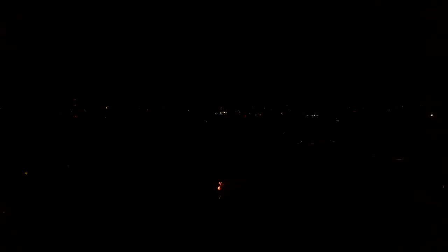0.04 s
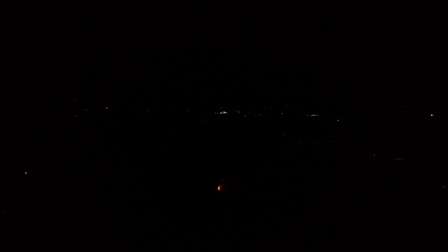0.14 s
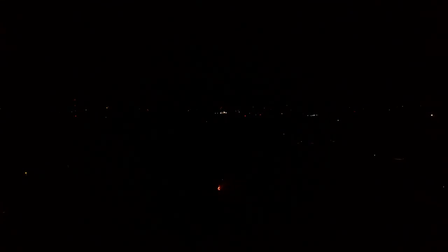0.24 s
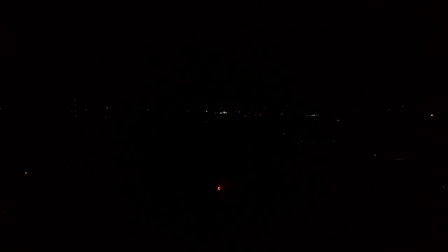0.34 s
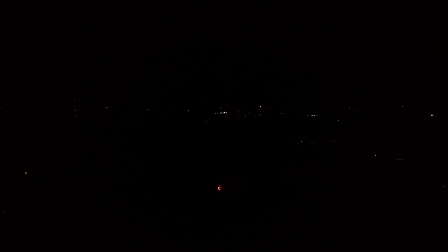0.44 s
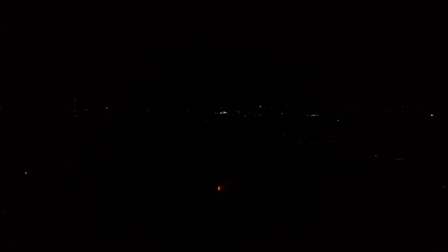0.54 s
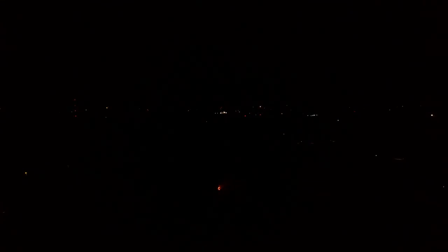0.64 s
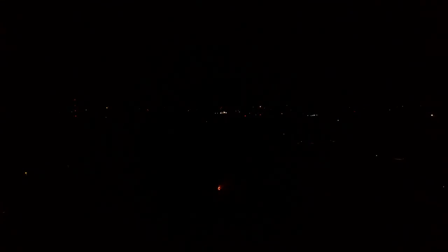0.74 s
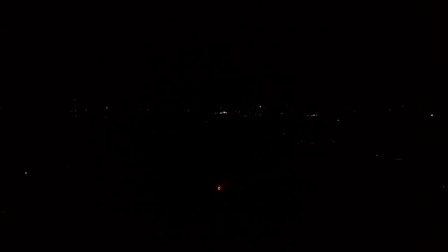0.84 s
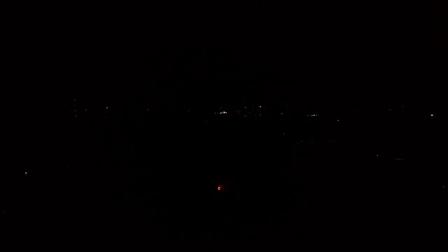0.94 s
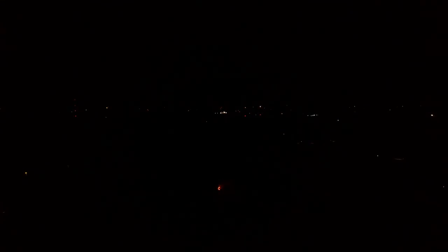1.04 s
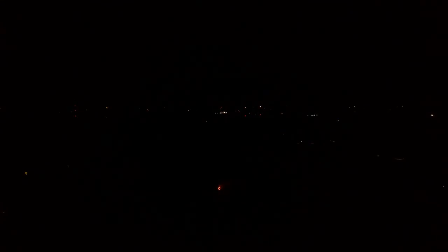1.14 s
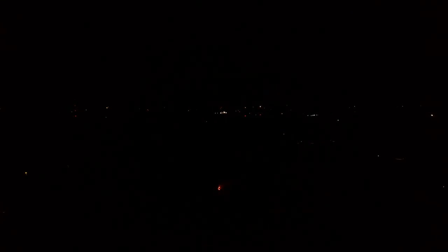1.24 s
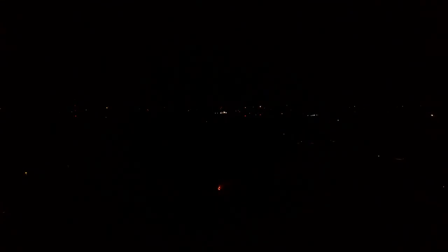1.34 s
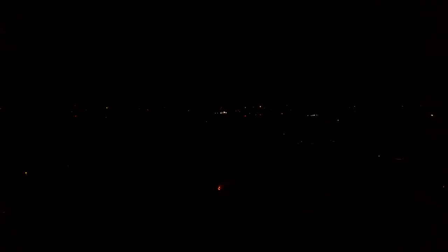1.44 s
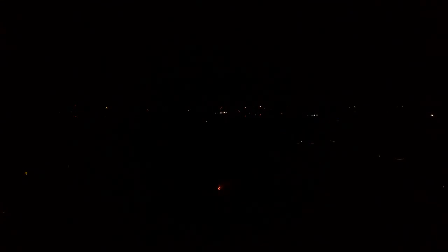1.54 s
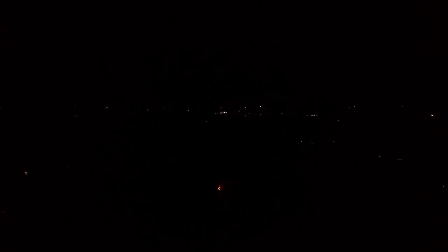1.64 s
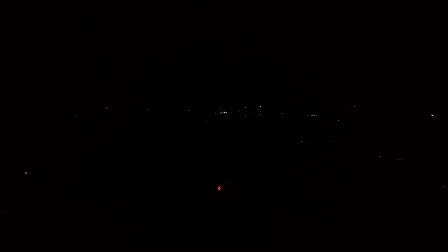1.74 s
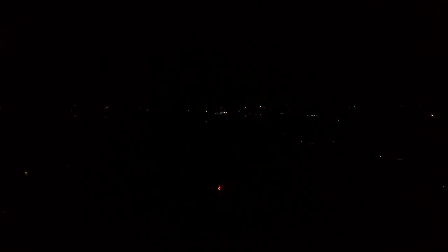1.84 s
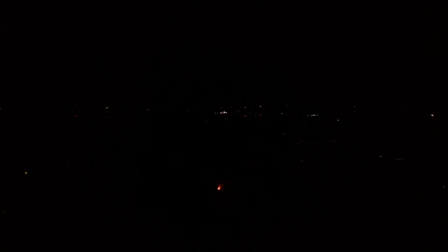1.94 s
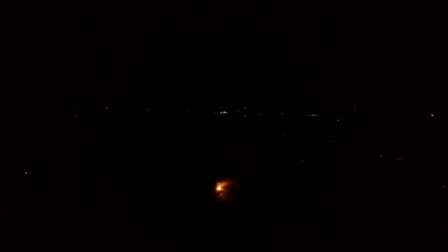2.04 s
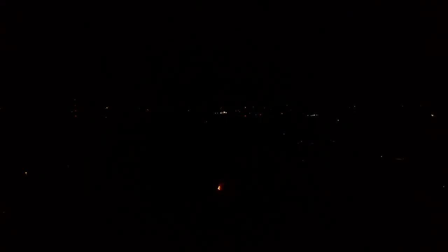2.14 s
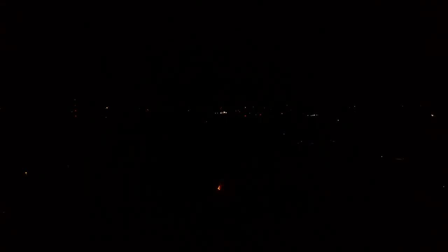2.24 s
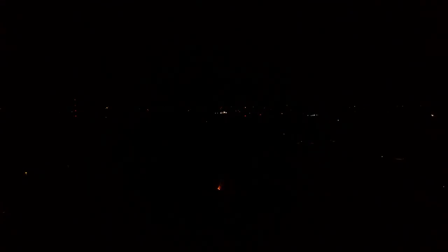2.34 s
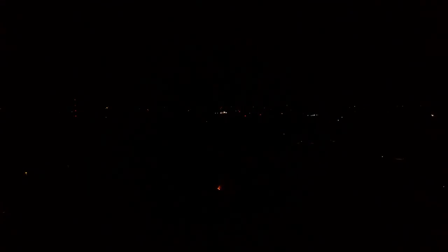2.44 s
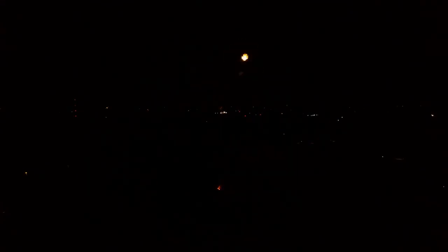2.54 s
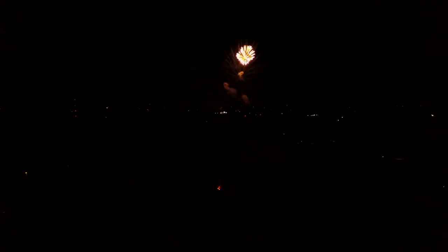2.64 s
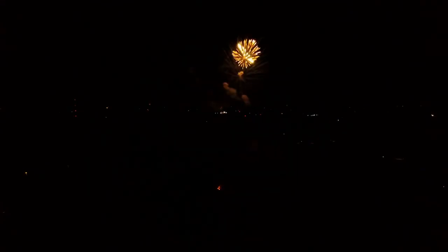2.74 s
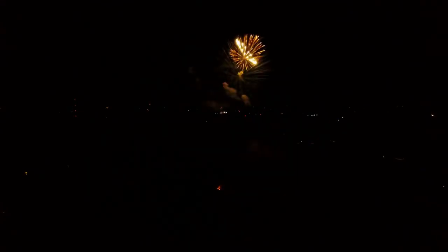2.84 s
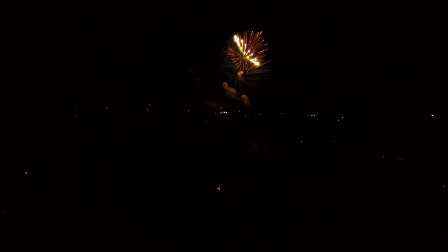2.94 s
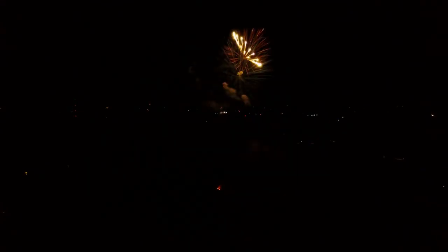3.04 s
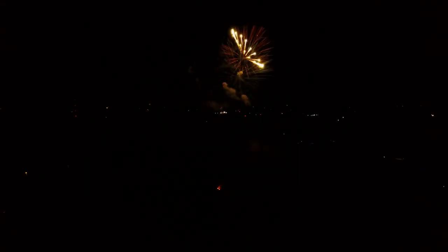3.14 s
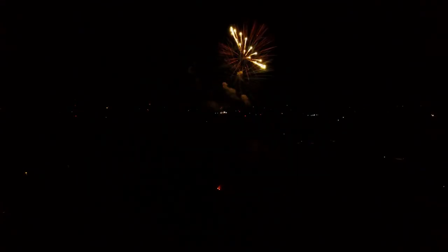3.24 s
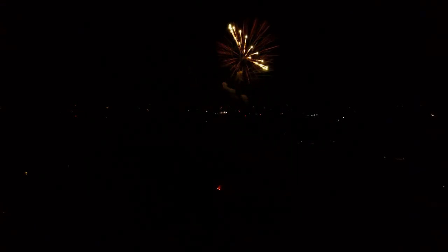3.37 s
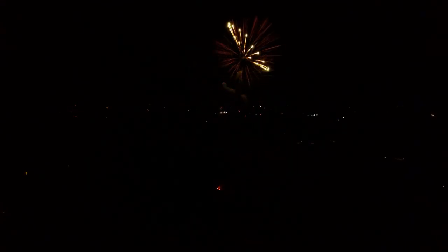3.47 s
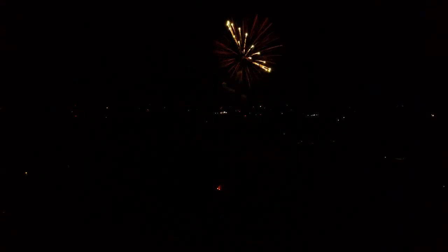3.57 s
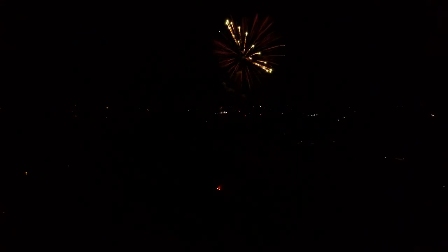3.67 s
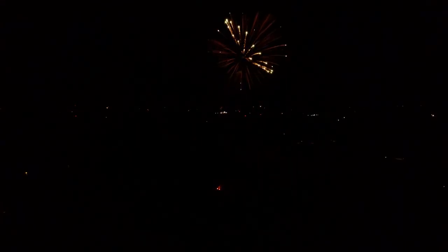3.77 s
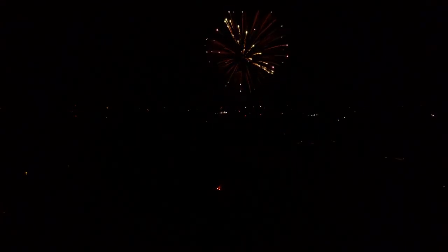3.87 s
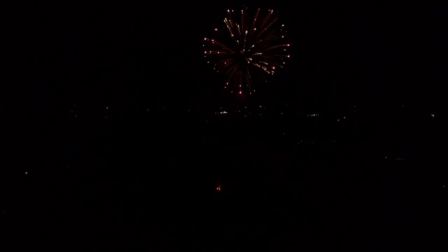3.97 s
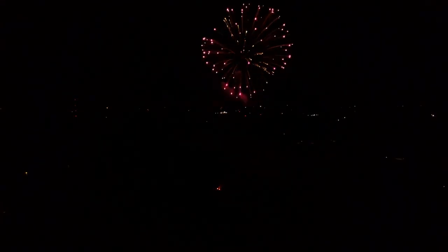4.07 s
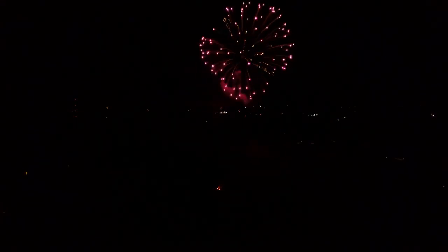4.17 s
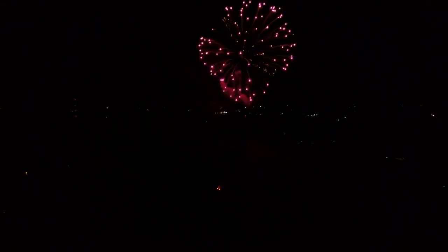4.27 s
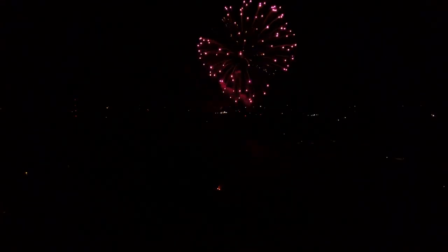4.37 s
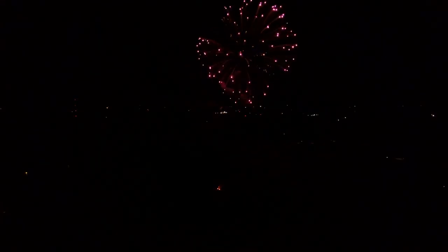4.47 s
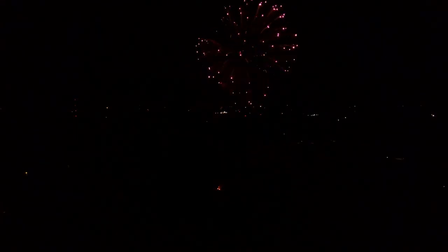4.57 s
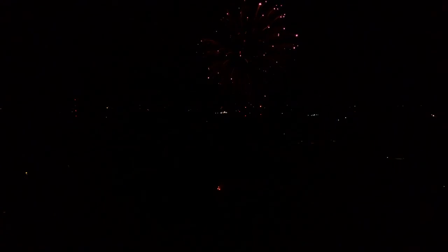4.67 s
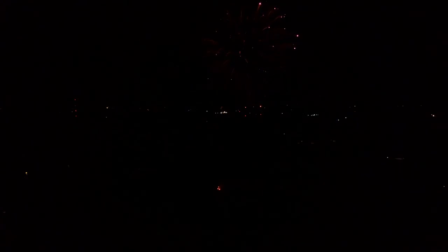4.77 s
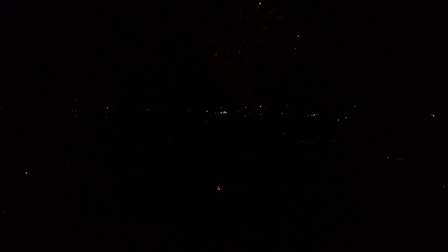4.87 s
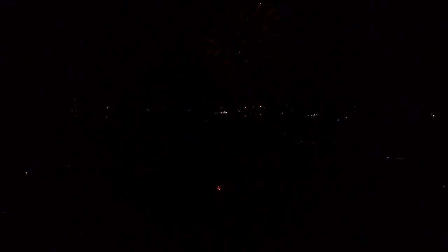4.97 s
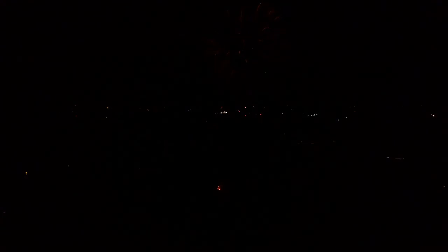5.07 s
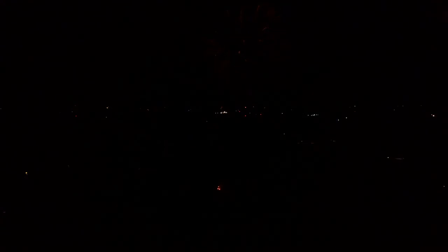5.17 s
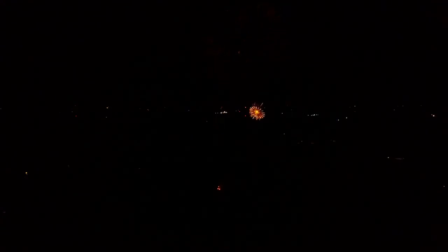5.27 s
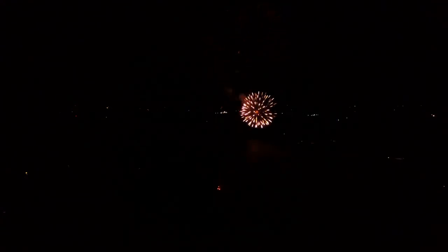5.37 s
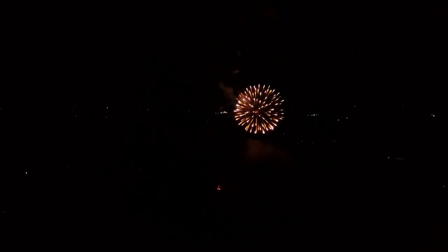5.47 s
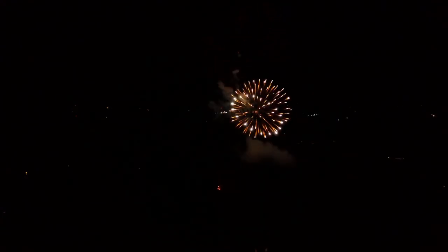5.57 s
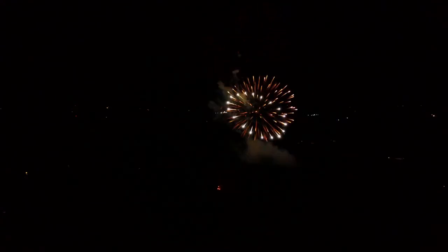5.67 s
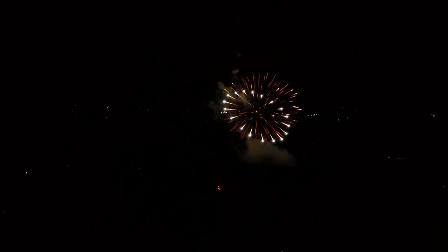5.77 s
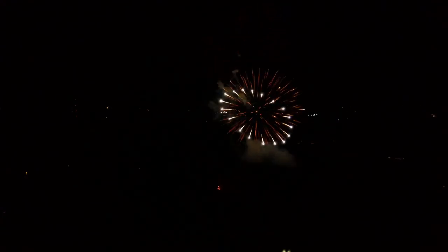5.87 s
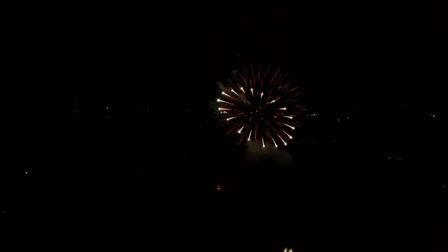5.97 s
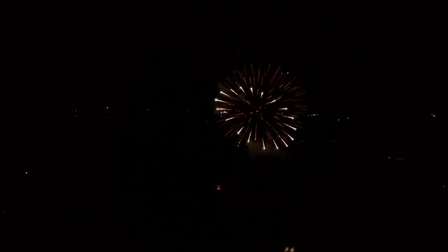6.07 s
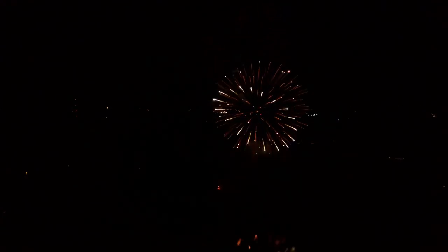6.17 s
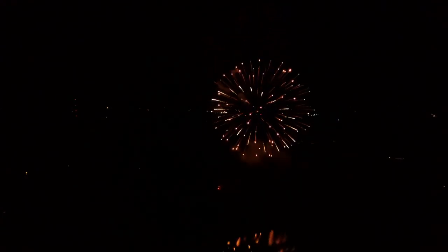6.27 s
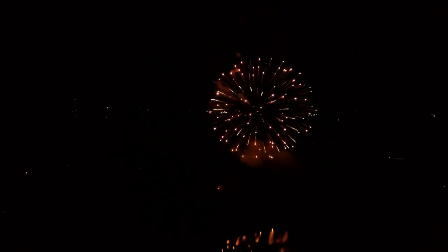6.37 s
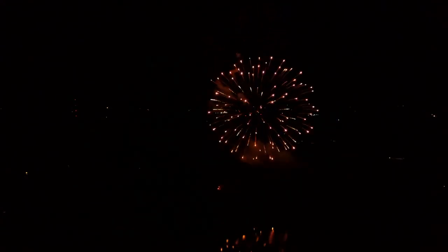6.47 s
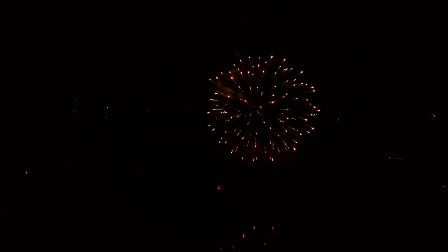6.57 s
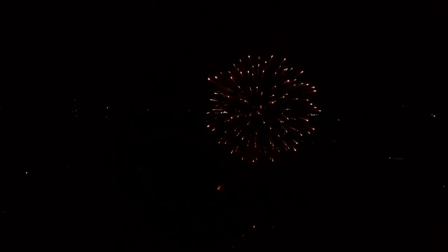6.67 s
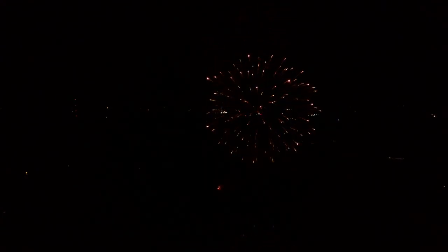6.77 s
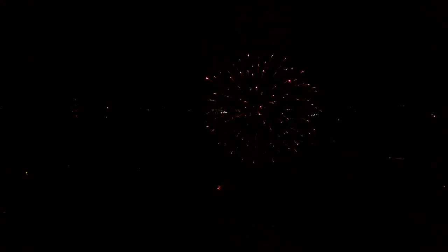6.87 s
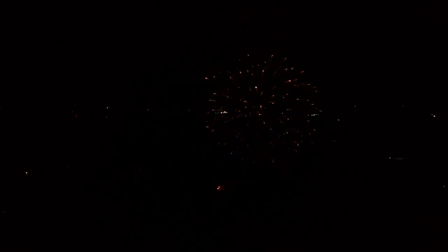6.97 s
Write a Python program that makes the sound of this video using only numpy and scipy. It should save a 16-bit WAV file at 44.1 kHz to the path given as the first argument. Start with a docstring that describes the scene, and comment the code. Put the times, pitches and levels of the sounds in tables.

```python
"""Mortars fire and their shells burst over a town at night, heard from a camera on a hillside.
Each bang is a shock front with crackle, a boom of shaped noise and a clatter of random reflections.
Walls slap the shots back; long echoes roll in as swelling, dulled grains. Faint far fireworks pop too.
A distant engine hums over street rumble (wavering sines, noise); the camera adds motor whine and hiss.
Its gain control ducks under loud sound, and the biggest bangs clip flat."""
import sys
import numpy as np
from scipy import signal
from scipy.fft import rfft, irfft, next_fast_len
from scipy.io import wavfile
from scipy.ndimage import minimum_filter1d

SR = 44100
rng = np.random.default_rng(int(sys.argv[2]) if len(sys.argv) > 2 else 0)


def int16_out(signal):
    """Quantize to a 16-bit WAV file."""
    q = np.round(np.clip(np.atleast_2d(signal).T, -1, 1) * 32767)
    wavfile.write(sys.argv[1], SR, q.astype(np.int16))


N = 309141
TIME = np.arange(N) / SR

# mortars firing on the ground: (time [s], front level [dB], push [ms], edge [Hz],
# clatter level [dB], clatter t60 [s], echo level [dB], roll level [dB])
LAUNCHES = [(1.5395, -3, 6.2, 1740, -20, 0.32, -7, -33.5), (1.585, -6, 1.38, 1060, -23, 0.41, -21.5, -38.5),
            (3.5833, -4, 3.23, 1120, -27, 0.26, -15, -40.5)]
# shells bursting overhead: (time [s], front level [dB], push [ms], edge [Hz],
# clatter level [dB], clatter t60 [s], echo level [dB], roll level [dB])
BURSTS = [(4.0515, 18.4, 1.75, 3800, -3, 0.14, 4.5, -36.5),
          (6.7088, 19.5, 2.67, 4470, -6.5, 0.23, 7, -33.5)]
# other paths from the mortars: one just ahead of the main front, two near walls, three far house fronts:
# (delay [s], front [dB re shot's echo], clatter [dB re shot's echo], push [ms], edge [Hz], clatter t60 [s])
LAUNCH_ECHOES = [(-.004, -28, -18, 0.88, 3070, 0.14), (0.0703, -5, -20, 0.55, 2800, 0.089),
                 (0.1011, -9, -21.5, 0.47, 1270, 0.16), (.35, -19, -25.5, 1.1, 1700, .07),
                 (.374, -5, -14.5, 1.4, 1150, 0.083), (.389, -3, -13, 0.56, 1330, 0.096)]
# two walls near the camera slapping each burst back:
# (delay [s], front [dB re shot's echo], clatter [dB re shot's echo], push [ms], edge [Hz], clatter t60 [s])
BURST_ECHOES = [(.035, -1, -21, 0.7, 2100, .09), (0.0596, -9, -19.5, .8, 4640, 0.12)]
# faint reports of far fireworks: (time [s], clatter level [dB], boom level [dB], edge [Hz])
FAR_REPORTS = [(1.463, -38, -50, 1300), (2.659, -43, -50, 1510), (3.517, -36, -30, 3470),
               (4.397, -29.5, -24.5, 1250), (5.332, -39.5, -29, 900), (5.372, -43, -27.5, 690),
               (6.931, -29, -27, 1620), (6.975, -29, -28, 1200)]
# what each front sets ringing around the camera: (frequency [Hz], relative level [dB], t60 [s])
RESONANCES = [(101, -16.5, 0.2), (195, -14.5, 0.13), (406.4, -3.5, 0.033), (1032, -12.5, 0.02),
              (1350, -14.5, 0.035), (1580, -16, .04)]
# boom spectrum: (multiple of the boom's own pitch [ratio], level [dB])
BOOM_SPECTRUM = [(.2, -29), (.6, -6), (1, -0.5), (1.5, -10.5), (2.2, -10), (3.5, -21), (5, -26), (12, -71)]
# clatter and crackle spectrum: (frequency [Hz], level [dB])
CLATTER_SPECTRUM = [(50, -22), (180, -7), (290, -1), (420, 5), (590, -8.5), (750, -4), (950, -6),
                    (1400, -5.5), (2000, -11.5), (2600, -11.5), (3200, -17.5), (4600, -10.5), (5600, -21.5),
                    (7200, -15), (10000, -33)]
# echoes rolling back from houses and hills after a launch:
# (delay [s], level [dB re shot's roll], swell [s], t60 [s], dulling above [Hz])
LAUNCH_ROLLS = [(.03, 0, 0.13, 2.47, 3700), (.35, -1, 0.08, 3.07, 2100)]
# echoes rolling back from farther hills after a burst:
# (delay [s], level [dB re shot's roll], swell [s], t60 [s], dulling above [Hz])
BURST_ROLLS = [(.05, 2.5, 0.047, 3.4, 8500), (.47, 1, .34, 3.46, 2370), (.65, 0, .49, 1.64, 201.3)]
# spectrum of the rolling echoes: (frequency [Hz], level [dB])
ROLL_SPECTRUM = [(25, -19), (60, -4.5), (140, -2), (350, 1.5), (600, -10), (1200, -11.5), (2400, -16.5),
                 (4600, -21.5), (7000, -28), (9000, -52)]
# engine loudness curve: (time [s], level [dB])
ENGINE_LEVEL = [(0, -2.5), (1.4, 2.5), (2.5, 3), (3.4, 5), (5.2, 3.5), (6, 2), (7, 7)]
# engine hum, before the loudness curve: (frequency [Hz], level [dB], pitch wander [share])
ENGINE_HUM = [(126.4, -47.5, 0.0033), (144.7, -46.5, 0.0057), (202.1, -54.5, 0.0091), (344, -56.5, 0.00718),
              (641, -61, 0.00366), (689.4, -61, 0.00438)]
# spectrum of the street rumble: (frequency [Hz], level [dB])
TOWN_SPECTRUM = [(20, -32), (40, -10), (70, -1.5), (140, 7), (200, 0.5), (350, 0.5), (490, -12), (670, -5),
                 (800, -16.5), (1500, -17), (3000, -56.5)]
# camera motor whine: (frequency [Hz], level [dB], pitch wander [share])
MOTOR_WHINE = [(1696, -60, .001), (5087, -70, .0003), (6783, -70, .0002), (7860, -80, .0002)]
# harmonics 2 to 5 of the camera's motor: (level [dB])
MOTOR_HARMONICS = [-61, -68.5, -63.5, -61]
# swells of a thin tone: (time [s], level [dB])
THIN_SWELLS = [(.25, -62.5), (3.25, -58.5), (5.8, -58)]
# spectrum of the camera's hiss: (frequency [Hz], level [dB])
HISS_SPECTRUM = [(300, -7.5), (1300, -10), (2200, 1), (3000, -2), (3800, 2), (4900, 3), (5500, -5.5),
                 (6200, -2), (6900, 1.5), (7800, -12.5), (8500, -42), (12000, -23.5), (14000, -31)]

# a boom lies this far under its front, and its period lasts this many pushes
BOOM_DB, BOOM_PUSHES = -12, 3.24
# an echo's boom against its front, and its pitch
LAUNCH_ECHO_BOOM_DB, BURST_ECHO_BOOM_DB, ECHO_BOOM_HZ = -20, -17.5, 108
# shared by the far reports; their front stands this far above their clatter
FAR_PUSH_MS, FAR_BOOM_HZ, FAR_T60_S, FAR_FRONT_DB = 1.3, 135, 0.23, 4
MOTOR_HZ = 924.8
THIN_HZ, THIN_SWELL_S, THIN_REST_DB = 1274, .22, -71
TOP_HZ = 14000


def bangs(crack_db=-20, build_s=0.00052):
    """Each front with its bright crack, the boom that follows and the clatter from nearby buildings."""
    out, t = np.zeros(N), TIME[:SR]
    for start_s, db, push_ms, edge_hz, boom_db, boom_hz, clatter_db, clatter_t60 in arrivals():
        front = undb(db) * (shock(t, push_ms, edge_hz) + undb(crack_db) * crackle(t, edge_hz))
        tail = undb(boom_db) * boom(t, boom_hz) + clatter(t, edge_hz, clatter_db, clatter_t60)
        build_up = 1 - np.exp(-t / build_s)
        add(out, start_s, front + tail * build_up)
    return microphone_top(out)


def arrivals():
    """All shock fronts that reach the camera: launches, bursts and far reports."""
    yield from fronts(LAUNCHES, LAUNCH_ECHOES, LAUNCH_ECHO_BOOM_DB)
    yield from fronts(BURSTS, BURST_ECHOES, BURST_ECHO_BOOM_DB)
    for start_s, clatter_db, boom_db, edge_hz in FAR_REPORTS:
        front_db = clatter_db + FAR_FRONT_DB
        yield start_s, front_db, FAR_PUSH_MS, edge_hz, boom_db, FAR_BOOM_HZ, clatter_db, FAR_T60_S


def fronts(shots, echoes, echo_boom_db):
    """Every shot arrives by its main path, then by each other path; a longer push booms lower."""
    for start_s, db, push_ms, edge_hz, clatter_db, t60, echo_db, _ in shots:
        boom_hz = 1000 / (BOOM_PUSHES * push_ms)
        yield start_s, db, push_ms, edge_hz, db + BOOM_DB, boom_hz, clatter_db, t60
        for delay_s, wall_db, scatter_db, wall_push_ms, wall_hz, wall_t60 in echoes:
            slap_db = echo_db + wall_db
            boom_db = slap_db + echo_boom_db
            scattered_db = echo_db + scatter_db
            yield (start_s + delay_s, slap_db, wall_push_ms, wall_hz,
                   boom_db, ECHO_BOOM_HZ, scattered_db, wall_t60)


def shock(t, push_ms, edge_hz, ground_ms=0.763, ground_db=-7, suck_db=-7, bass_cut_hz=58):
    """A jump of pressure that falls through zero into suction; the ground repeats it at once."""
    ms = 1000 * t
    age = ms / push_ms
    blast = (1 - age) * np.exp(-age)
    # a straight fall from push to equal suction deepens the swing
    blast = blast + undb(suck_db) * (1 - 2 * age) * (age < 1)
    blast = blast + undb(ground_db) * np.interp(ms - ground_ms, ms, blast, left=0)
    # air rounds the edge, and the microphone cannot follow the slow part, so it swings back
    rounded = butter(blast, edge_hz, "low")
    return ring(butter(rounded, bass_cut_hz, "high")) / 2


def ring(x):
    """Add the short resonances of the surroundings to a pulse."""
    out = x
    for hz, db, t60 in RESONANCES:
        pole = np.exp(-np.log(1000) / (t60 * SR) + 2j * np.pi * hz / SR)
        gain = 10 * undb(db) * (1 - abs(pole))
        out = out + gain * signal.lfilter([1], [1, -pole], x).real
    return out


def crackle(t, edge_hz, t60=0.026, low_cut_hz=2500, edge_ratio=3.17):
    """Turbulent air frays the front into a few milliseconds of crackle."""
    noise = colour(rng.standard_normal(SR), CLATTER_SPECTRUM)
    bright = unit(butter(noise, low_cut_hz, "high"))
    return butter(bright * fade(t, t60), edge_ratio * edge_hz, "low", order=4)


def boom(t, boom_hz, t60=0.16):
    """A short decaying noise whose spectrum is scaled to the boom's pitch."""
    spectrum = np.array(BOOM_SPECTRUM) * [boom_hz, 1]
    return colour(rng.standard_normal(SR), spectrum) * fade(t, t60)


def clatter(t, edge_hz, db, t60, edge_ratio=1.73, clusters_db=2.5):
    """Near reflections come in clusters; a duller front makes them duller."""
    hits = colour(facets(SR, per_s=3600, spread_db=1.5), CLATTER_SPECTRUM)
    hits = unit(butter(hits, edge_ratio * edge_hz, "low"))
    return hits * undb(db + clusters_db * walk(146)[:SR]) * fade(t, t60)


def microphone_top(x, mic_hz=7600, top_octave_db=-9):
    """The camera's microphone picks up little of the bangs' top octave."""
    below = butter(x, mic_hz, "low", order=6)
    above = butter(x, mic_hz, "high", order=6)
    return below + undb(top_octave_db) * above


def rolls(shots, paths, lumpy_db=2.5):
    """After each shot thousands of far reflections swell and die away, dulled path by path."""
    out = np.zeros(N)
    for start_s, *_, roll_db in shots:
        for delay_s, db, swell_s, t60, dull_hz in paths:
            grains = colour(facets(N, per_s=1600, spread_db=3.5), ROLL_SPECTRUM)
            grains = unit(butter(grains, dull_hz, "low"))
            swell = np.minimum(TIME / swell_s, 1)
            decay = fade(np.maximum(TIME - swell_s, 0), t60)
            level = undb(roll_db + db + lumpy_db * walk(23.7))
            add(out, start_s + delay_s, grains * swell * decay * level)
    return out


def town(rumble_db=-43.0, rumble_share=0.77, unrest_db=1.9):
    """A distant engine drones over the rumble of the streets, which partly follows its loudness."""
    engine_db = np.interp(TIME, *np.transpose(ENGINE_LEVEL))
    rumble_level = undb(rumble_db + rumble_share * engine_db + unrest_db * walk(3.09))
    rumble = colour(rng.standard_normal(N), TOWN_SPECTRUM) * rumble_level
    hum = tones(ENGINE_HUM, wander_rate=14, flutter_db=0.0) * undb(engine_db)
    return rumble + hum


def camera(hiss_db=-51.5):
    """The camera's own motor whine and hiss, with a thin tone that comes and goes."""
    harmonics = [(k * MOTOR_HZ, db, .0004) for k, db in enumerate(MOTOR_HARMONICS, 2)]
    motor = tones(harmonics, wander_rate=30, flutter_db=-1.2)
    whine = tones(MOTOR_WHINE, wander_rate=30, flutter_db=-0.5)
    hiss = undb(hiss_db) * colour(rng.standard_normal(N), HISS_SPECTRUM)
    return motor + whine + thin_tone() + hiss


def thin_tone():
    """A wavering sine with bell-shaped swells over a faint resting level."""
    level = undb(THIN_REST_DB)
    for peak_s, db in THIN_SWELLS:
        level = level + undb(db) * np.exp(-((TIME - peak_s) / THIN_SWELL_S) ** 2)
    return tones([(THIN_HZ, 0, .007)], wander_rate=70, flutter_db=2) * level


def tones(lines, wander_rate, flutter_db):
    """Sines that waver in pitch, and in level by the flutter given."""
    out = 0
    for hz, db, wander in lines:
        pitch = hz * (1 + wander * walk(wander_rate))
        phase = 2 * np.pi * np.cumsum(pitch) / SR
        level = np.sqrt(2) * undb(db + flutter_db * walk(5))  # dB is rms
        out = out + level * np.sin(phase)
    return out


def facets(count, per_s, spread_db):
    """Arrivals from many walls and roofs: random times, signs and sizes."""
    hit = rng.random(count) < per_s / SR
    sign = rng.choice([-1, 1], count)
    size = undb(spread_db * np.minimum(rng.exponential(1, count), np.pi))
    return hit * sign * size


def walk(rate):
    """Random values, rate per second, joined by lines; spread near 1."""
    steps = rng.standard_normal(N // 100)
    return np.interp(TIME * rate, np.arange(len(steps)), steps)


def colour(x, points):
    """Filter x by a curve of (frequency [Hz], level [dB]) points, at rms 1."""
    hz, db = np.transpose(points)
    size = next_fast_len(len(x))
    bins = np.maximum(np.fft.rfftfreq(size, 1 / SR), 1)
    gain = undb(np.interp(np.log(bins), np.log(hz), db))
    return unit(irfft(rfft(x, size) * gain, size)[:len(x)])


def butter(x, hz, kind, order=2):
    """Causal low-pass or high-pass."""
    return signal.sosfilt(signal.butter(order, min(hz, SR / 2 - 1), kind, fs=SR, output="sos"), x)


def fade(t, t60):
    """Exponential decay, 60 dB in t60 seconds."""
    return np.exp(-np.log(1000) * t / t60)


def undb(db):
    """Decibels to gain."""
    return 10 ** (np.asarray(db) / 20)


def unit(x):
    """Scale to rms 1."""
    return x / np.sqrt(np.mean(x ** 2))


def add(out, start_s, x):
    """Mix x into out from a given time."""
    i = min(int(start_s * SR), len(out))
    out[i:i + len(x)] += x[:len(out) - i]


def scene():
    """Everything that reaches the one microphone, with the camera's own noises."""
    echoes = rolls(LAUNCHES, LAUNCH_ROLLS) + rolls(BURSTS, BURST_ROLLS)
    return (bangs() + echoes + town() + camera())[None]


def gain_control(x, top_db=-12, most_db=12, sense_s=.025, hold_s=.39, release_s=.15):
    """Turns down quickly on a loud sound, holds, then creeps back."""
    keep = np.exp(-1 / (sense_s * SR))
    power = signal.lfilter([1 - keep], [1, -keep], x ** 2)
    level_db = 10 * np.log10(power + 1e-12)
    wanted_db = np.clip(top_db - level_db, -most_db, 0)
    # the lowest gain of the past hold_s stays in force
    half = int(hold_s * SR / 2)
    held_db = minimum_filter1d(wanted_db, 2 * half + 1, origin=half, mode="nearest")
    keep = np.exp(-1 / (release_s * SR))
    released_db = signal.lfilter([1 - keep], [1, -keep], held_db)
    return x * undb(np.minimum(held_db, released_db))


def record(dry):
    """Gain control, flat clipping of the biggest fronts, and the top cut."""
    clipped = np.clip(gain_control(dry), -.67, .69)
    top_cut = signal.ellip(8, .2, 70, TOP_HZ, fs=SR, output="sos")
    return signal.sosfilt(top_cut, clipped)


dry = scene()
out = record(dry)
int16_out(out)
```